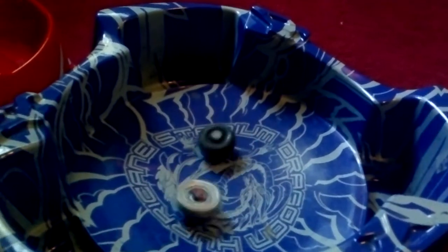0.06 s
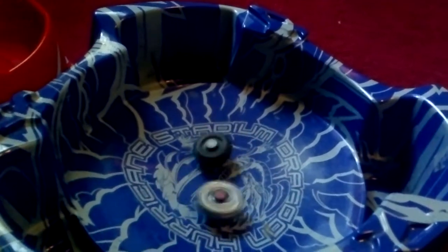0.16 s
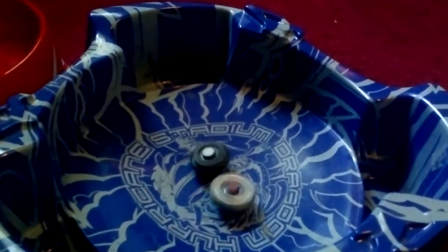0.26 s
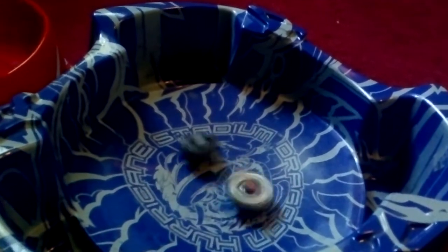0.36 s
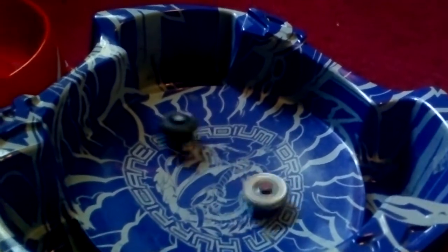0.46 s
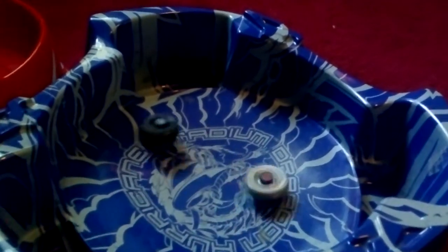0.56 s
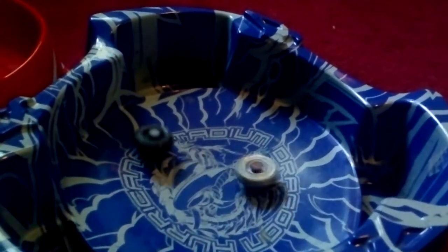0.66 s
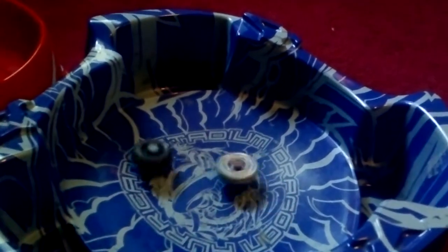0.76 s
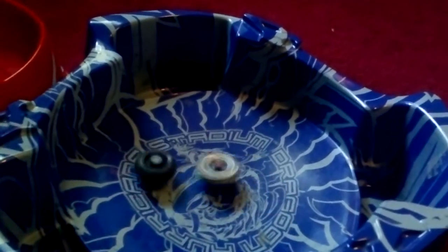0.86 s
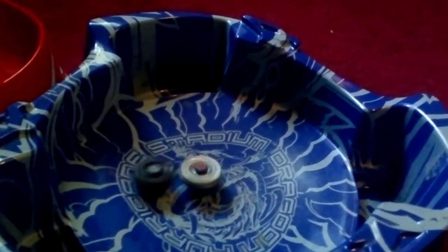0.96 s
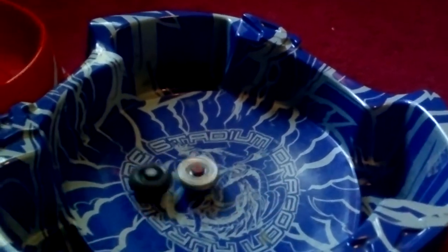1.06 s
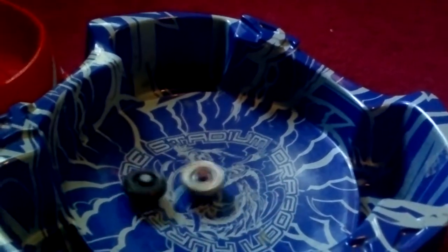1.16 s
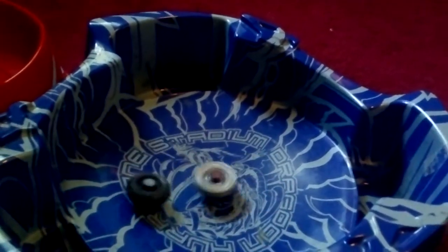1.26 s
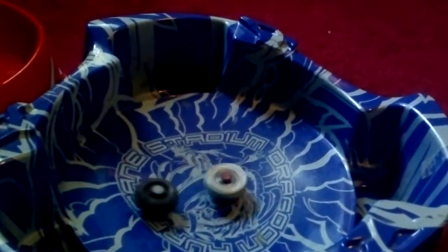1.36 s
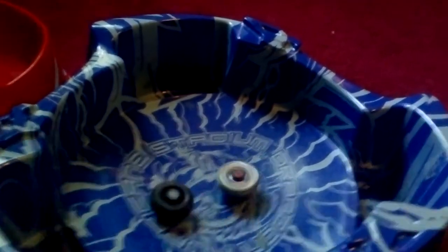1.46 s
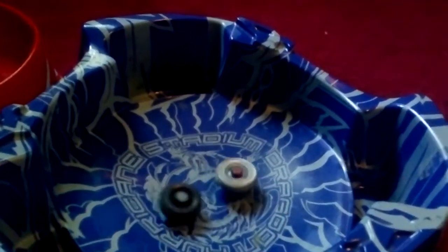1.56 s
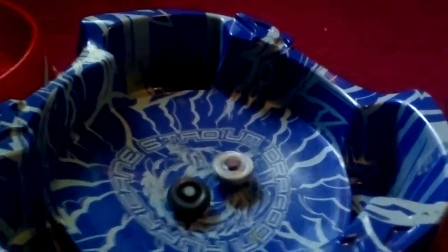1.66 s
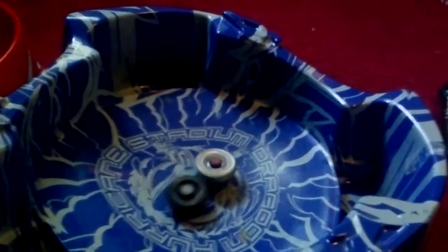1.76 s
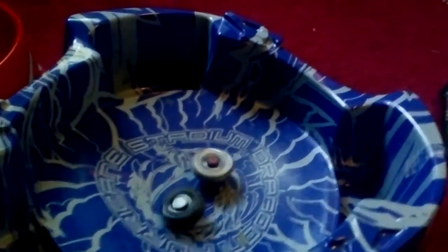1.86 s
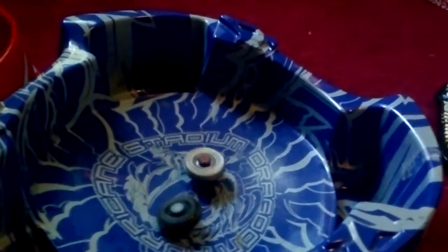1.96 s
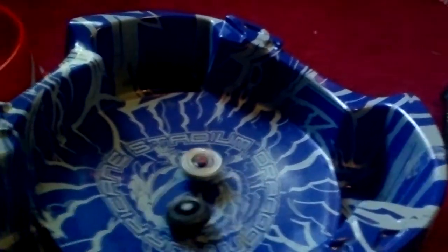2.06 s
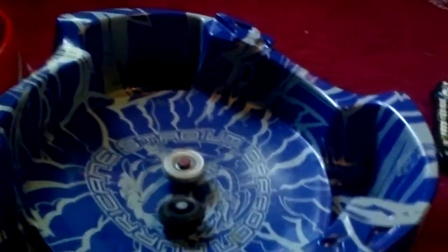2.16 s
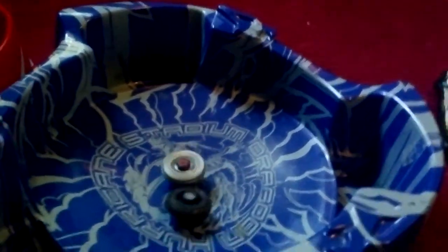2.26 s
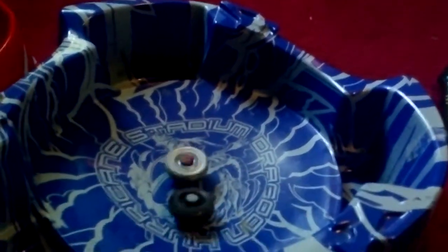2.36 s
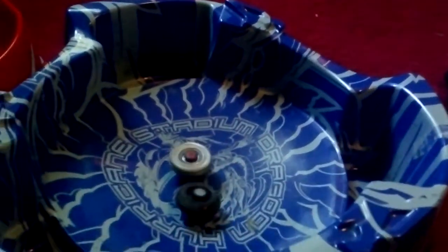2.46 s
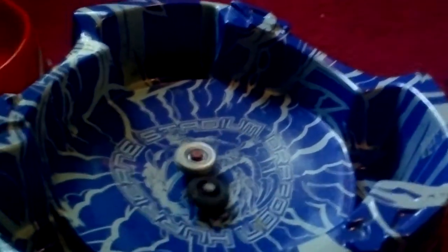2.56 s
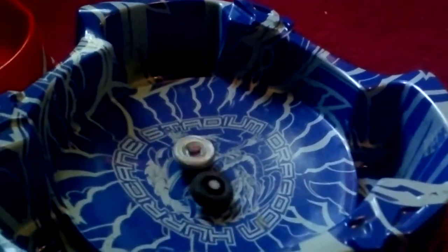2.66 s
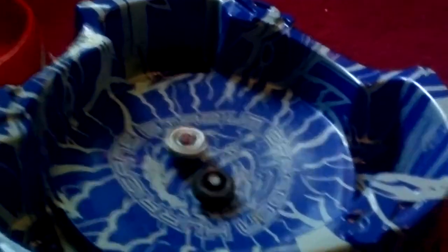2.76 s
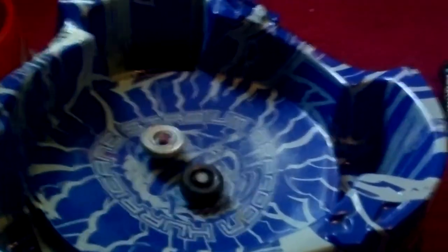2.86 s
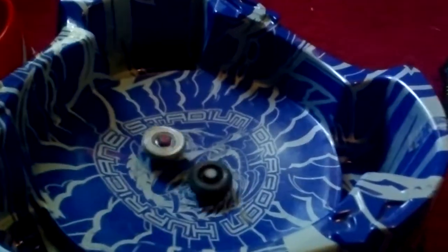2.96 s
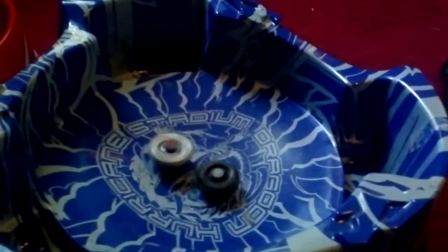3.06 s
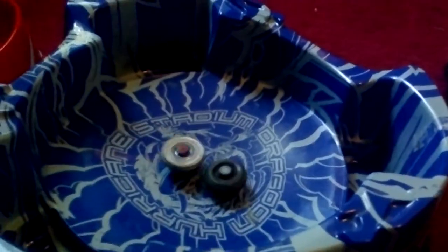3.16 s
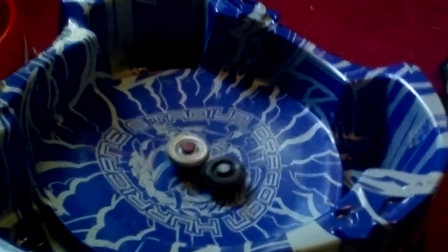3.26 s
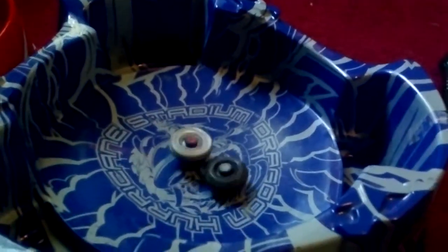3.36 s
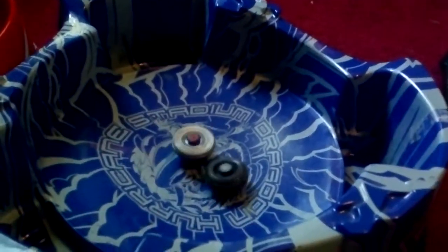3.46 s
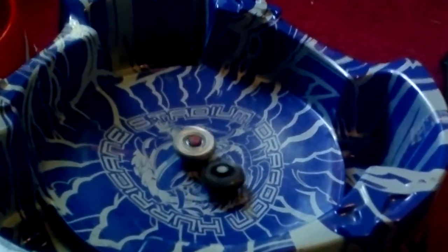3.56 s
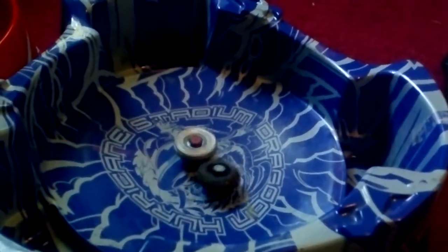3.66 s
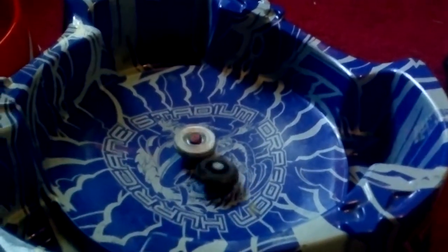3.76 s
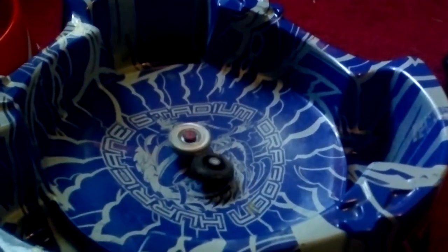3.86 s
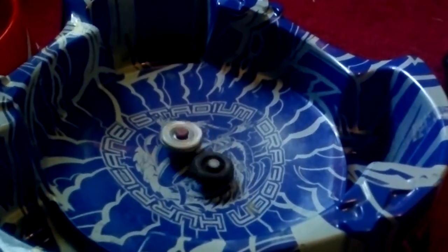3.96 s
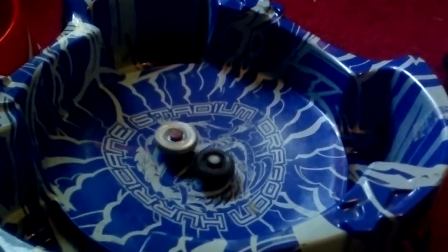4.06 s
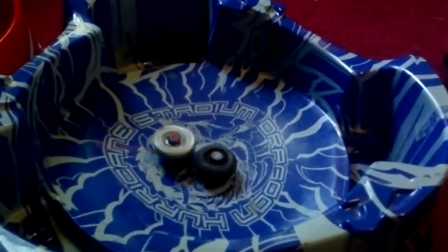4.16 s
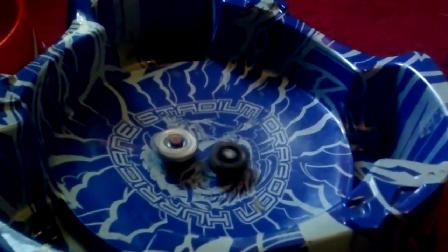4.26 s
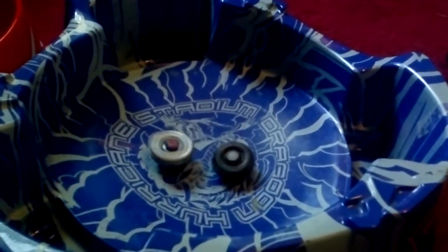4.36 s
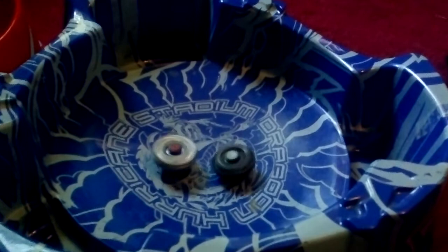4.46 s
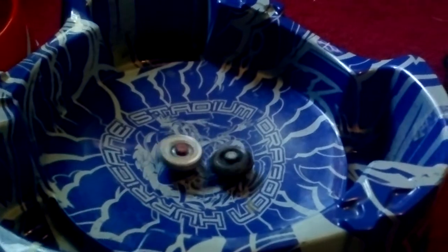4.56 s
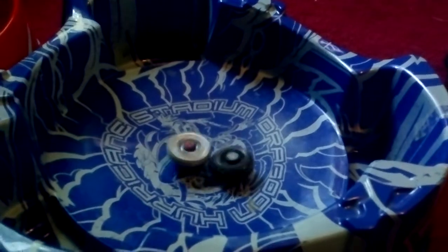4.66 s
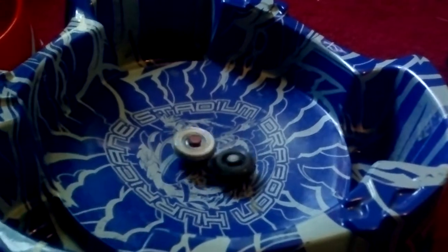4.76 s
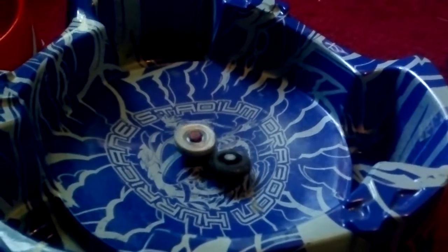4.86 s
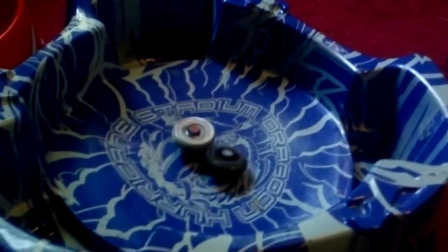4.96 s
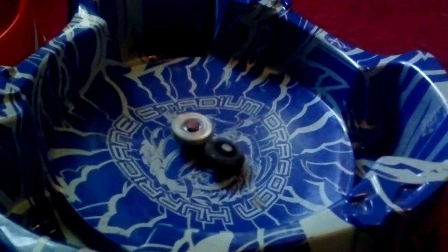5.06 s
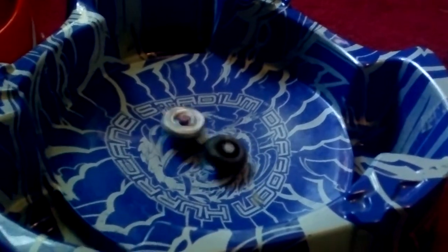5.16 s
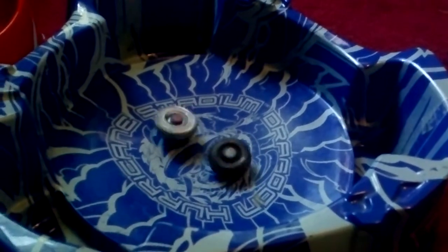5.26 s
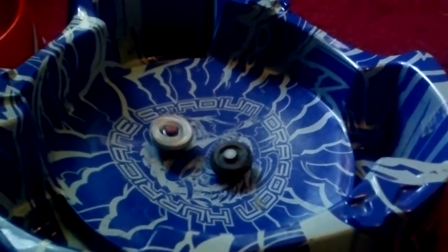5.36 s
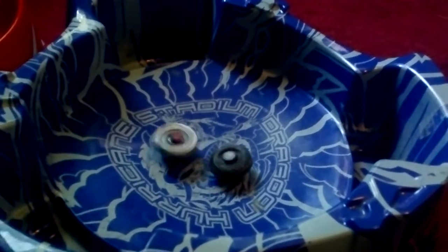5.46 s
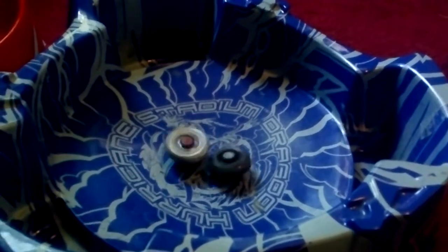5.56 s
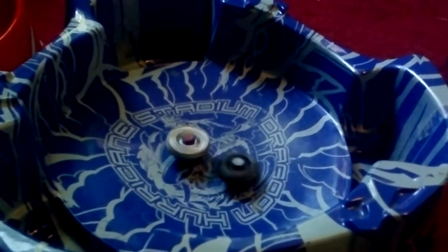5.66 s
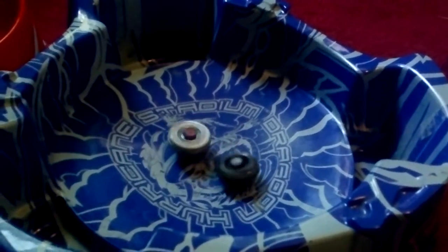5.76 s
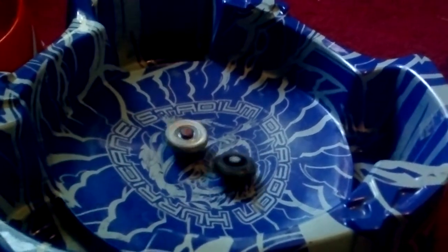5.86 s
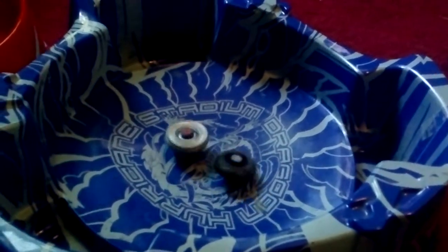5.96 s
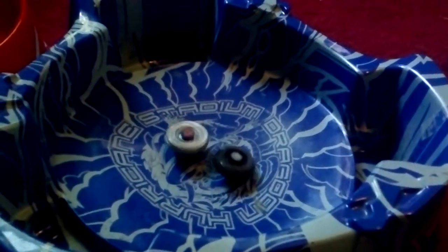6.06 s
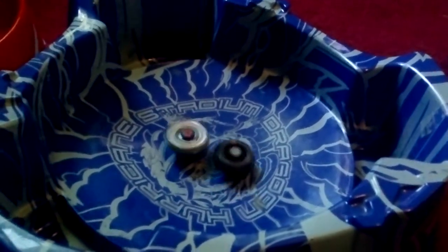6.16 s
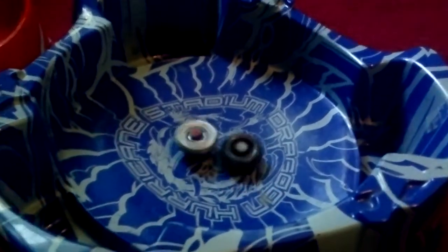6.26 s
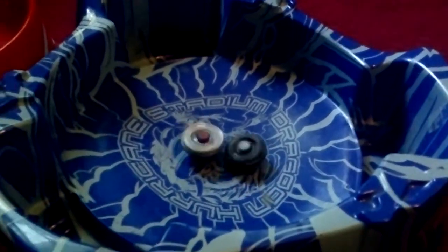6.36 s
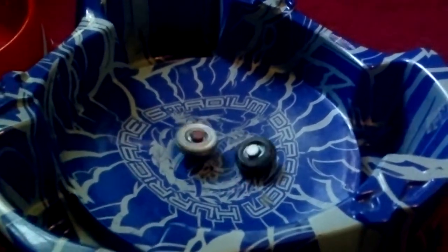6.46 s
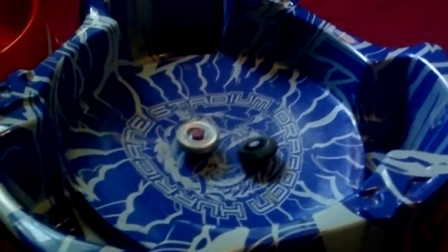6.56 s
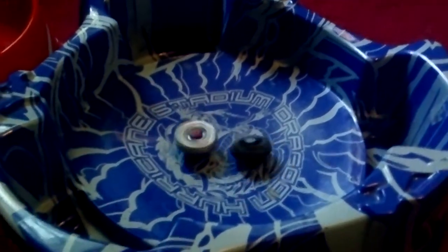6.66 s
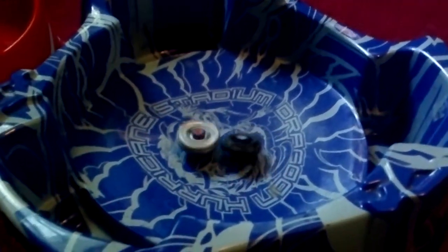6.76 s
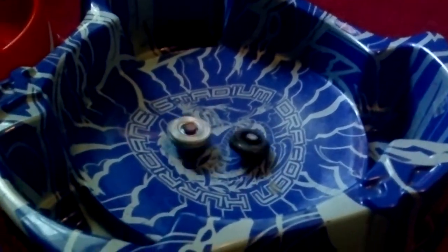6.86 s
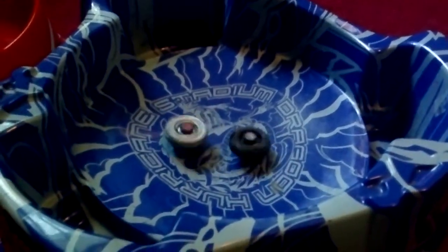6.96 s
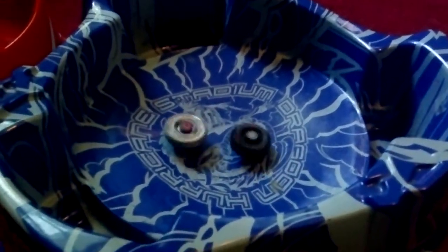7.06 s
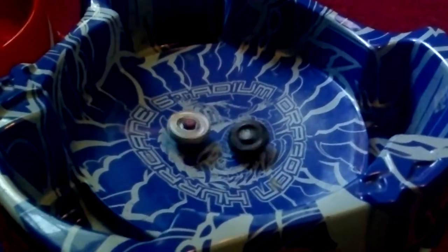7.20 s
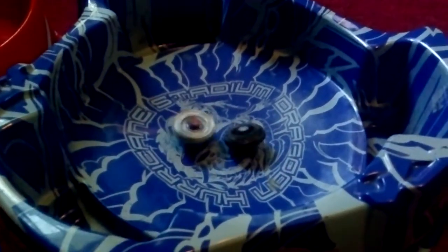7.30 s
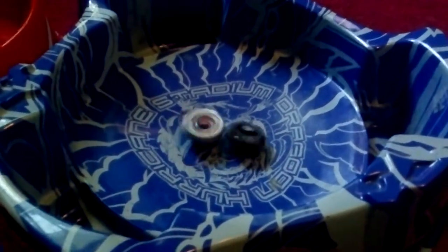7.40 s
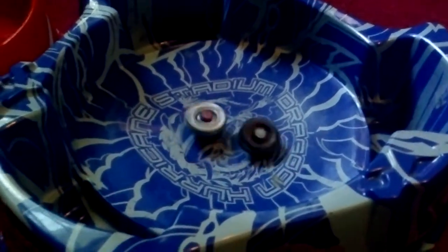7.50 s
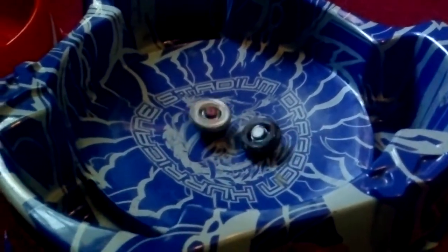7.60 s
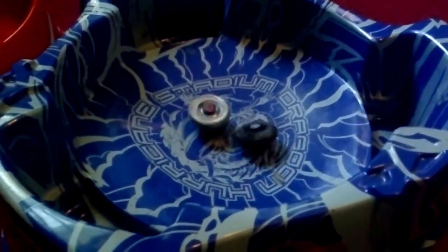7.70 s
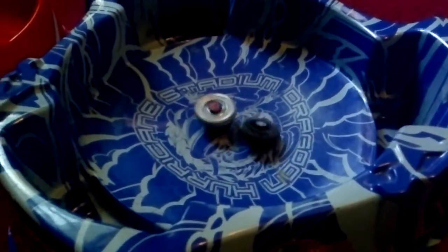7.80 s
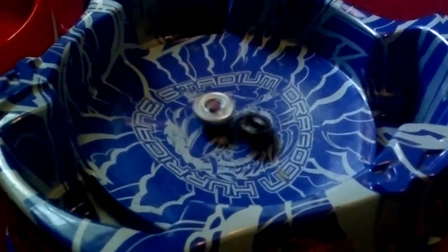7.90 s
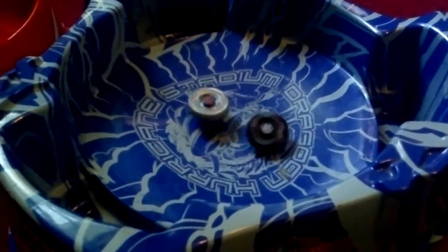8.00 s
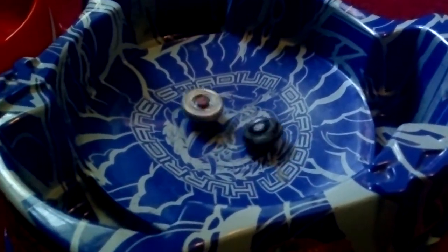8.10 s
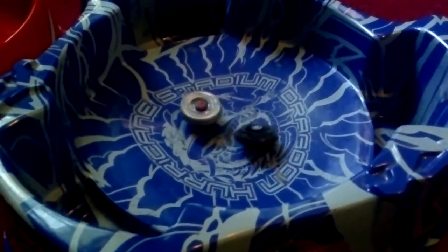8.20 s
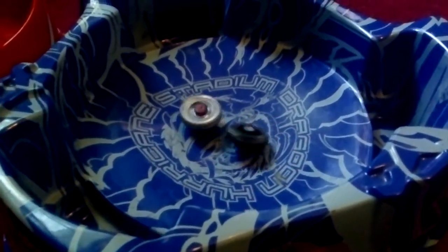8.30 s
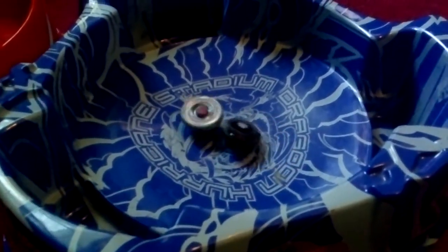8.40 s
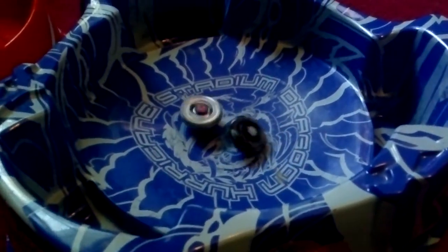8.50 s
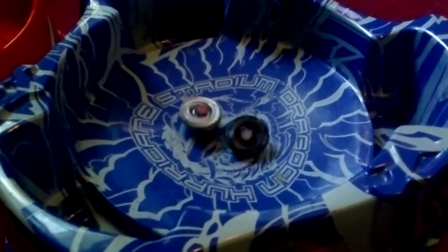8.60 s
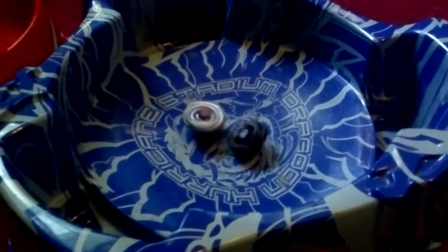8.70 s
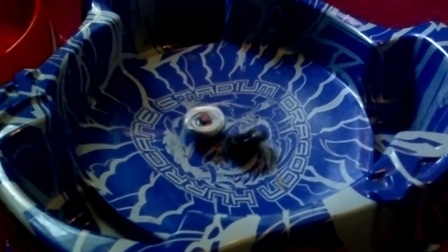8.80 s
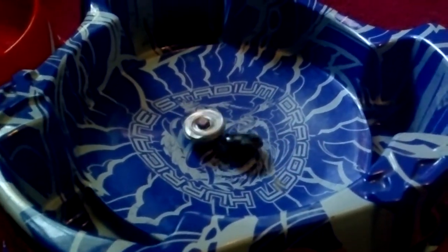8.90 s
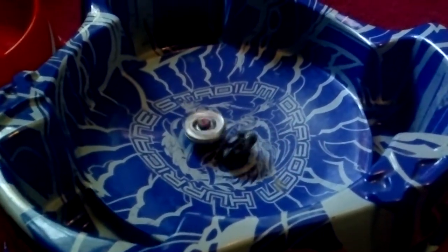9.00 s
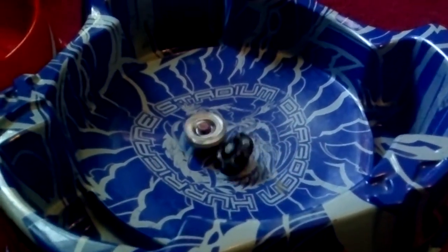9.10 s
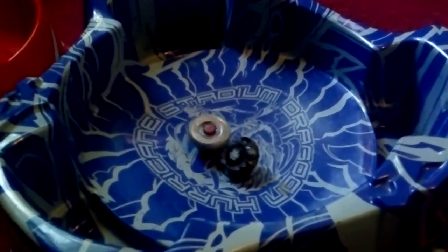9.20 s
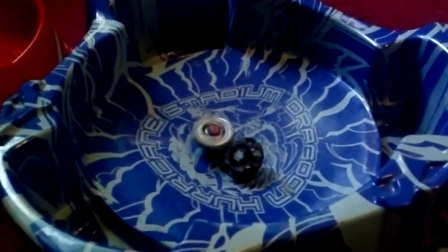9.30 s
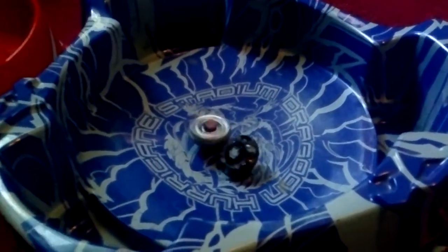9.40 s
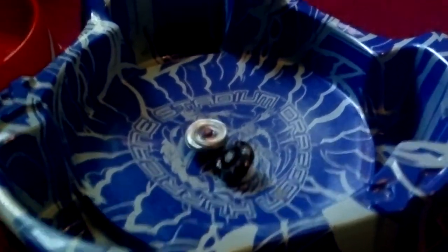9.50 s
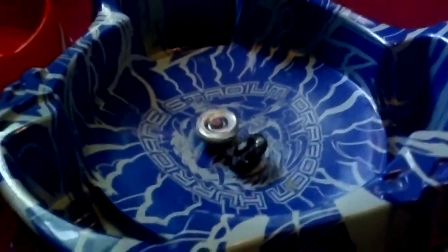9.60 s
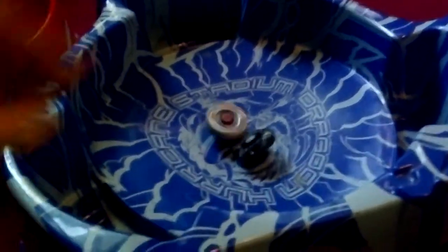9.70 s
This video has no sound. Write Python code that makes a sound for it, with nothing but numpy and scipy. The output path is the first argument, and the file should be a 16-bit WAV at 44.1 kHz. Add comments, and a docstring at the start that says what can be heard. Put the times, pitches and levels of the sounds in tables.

```python
"""Two metal-rimmed toy tops clack together as they spin in a thin plastic bowl on a carpet, near a microphone.
Each impact excites damped modes of the rims and the bowl, and a small room adds a decaying tail.
The tips whir, skip and skid as random grains of friction exciting the same bodies; faint squeaks are
narrow-band noise. Steady noise of room and recorder lies beneath, and the loudest clacks overload the recorder."""
import sys
import numpy as np
from scipy import signal
from scipy.fft import rfft, irfft
from scipy.io import wavfile

SR = 44100
rng = np.random.default_rng(int(sys.argv[2]) if len(sys.argv) > 2 else 0)


def unload_audio(sound):
    """Save the sound as a 16-bit wav file, at the path given as the first command line argument."""
    columns = np.transpose(np.atleast_2d(sound))
    # keep every value between -1 and 1, then stretch to whole-number steps
    steps = np.round(np.clip(columns, -1, 1) * 32767)
    wavfile.write(sys.argv[1], SR, steps.astype(np.int16))


N = 429534   # samples in the scene
SPAN = 18000   # samples given to each blow with its tail

# collisions of rim on rim: (time [s], crack level [dB], bright edge level [dB], bowl knock level [dB],
# then the level of each of the four rim rings [dB])
CLACK_EVENTS = [(0.421, 1, 4.5, -18.5, -44, -48, -0.5, -7), (1.0458, 0.5, 8, -22, -23.5, -10, -5.5, 2),
                (1.203, 0, 5.5, -24, -31, -27, 6.5, -11.5), (1.9012, -3, -3, -30.5, -30.5, -32, -10.5, -9),
                (2.3874, 4, 7, -23, -29, -15.5, 1.5, -4.5), (2.7328, -4, -4.5, -28.5, -38, -19, -4, -18),
                (3.341, -6, -7.5, -37.5, -42, -27, -21.5, -22),
                (3.7911, -7, -8, -32.5, -49.5, -24, -2.5, -3),
                (3.9745, -12, -5, -35, -40, -35, -7.5, -14.5),
                (4.3206, -2.5, -1, -24.5, -27.5, -31, -16, -14.5),
                (4.7338, -14, 2.5, -37, -53, -23, -41, -10), (5.217, -13, -4.5, -29.5, -43, -25, -16, -21),
                (5.692, -0.5, 4, -24.5, -24, -6.5, -9.5, -1.5),
                (6.4648, -3.5, -3.5, -33.5, -27, -17, -35, -14),
                (6.8672, -3.5, -1.5, -29, -34, -17.5, -11.5, -14),
                (7.4878, -5, -6, -29.5, -32.5, -26, -34, -14),
                (7.9771, -1, 1.5, -31.5, -31.5, -13.5, -11.5, -16),
                (8.4864, -4, -6.5, -32, -41.5, -30, -55, -7),
                (8.9987, -3.5, -1, -23.5, -24.5, -23, -14, -9),
                (9.4142, -13, -15.5, -39, -59, -35, -18, -19.5),
                (9.523, -19.5, -19, -39.5, -70, -60, -28.5, -23.5),
                (9.6515, -7.5, -14, -28, -58, -39, -15.5, -11)]
# rim modes whose strength depends on the spot struck: (frequency [Hz], T60 [s])
RIM_RINGS = [(2947, 0.16), (5615, 0.078), (5800, 0.046), (6235, 0.027)]
# weaker rim modes: (frequency [Hz], mean level re the crack, or re the edge above 6500 Hz [dB], T60 [s])
RIM_OVERTONES = [(3560, -20, .012), (4780, -18, .01), (6900, -15, .012), (8740, -23, .02),
                 (9600, -22, .018), (10050, -19, .008)]
THUMP_DB, THUMP_PER_EDGE = -11.5, .7   # bowl thump re the knock [dB], extra [dB per dB of bright edge]


def clacks():
    """Modal excitation by impact: each collision sets the rims and the bowl ringing in their damped modes."""
    s, crack_db, edge_db, knock_db, *ring_dbs = np.array(CLACK_EVENTS).T[:, :, None]
    blow = contact(count=len(s), chatter_s=0.0043)
    click = np.arange(SPAN) == 0

    crack = amp(crack_db) * band(blow, 2600, 5600)
    edge = amp(edge_db) * band(blow, 6300, 11280)
    rims = crack + edge
    to_mic_and_room = np.array([[[1]], [[.38]]])   # the rings reach the room more weakly than the crack
    for (hz, t60), db in zip(RIM_RINGS, ring_dbs):
        rims += amp(db) * ring(click, hz, t60) * to_mic_and_room
    for hz, db, t60 in RIM_OVERTONES:
        parent_db = edge_db if hz > 6500 else crack_db
        strength_db = parent_db + db + rng.normal(0, 4, s.shape)
        rims += amp(strength_db) * ring(click, hz, t60)

    knock = above(bowl(blow, above_hz=900) + 4.3 * band(blow, 1000, 3000), 1100)
    knock[1] += 2.9 * band(blow[1], 400, 1500)   # the bowl sends its lower tones sideways, into the room
    thump = bowl(blow, below_hz=1200) + 6.7 * above(band(blow, 100, 1500), 90)
    thump_gain = amp(THUMP_DB + THUMP_PER_EDGE * edge_db)

    direct, radiated = above(rims, 1700) + amp(knock_db) * (knock + thump_gain * thump)
    return in_room(direct, radiated, s[:, 0], wet_db=19, first_s=0.005)


def contact(count, chatter_s):
    """Impulsive contact: a click and a short chatter; averaged over directions, one click of equal energy."""
    t = np.arange(SPAN) / SR
    blow = .5 * rng.standard_normal((count, SPAN)) * np.exp(-t / chatter_s)
    blow[:, 0] = 1
    averaged = (t == 0) * np.linalg.norm(blow, axis=1, keepdims=True)
    return np.stack([blow, averaged])   # toward the microphone, into the room


# bowl modes: (frequency [Hz], level [dB], T60 [s])
BOWL_MODES = [(167.7, -29, 0.047), (300, -19.5, 0.088), (775.5, -16, 0.035), (1110, -23, 0.0052),
              (1638, -2.5, 0.006), (2004, -7, .01), (2540, -40, 0.013)]


def bowl(force, above_hz=0, below_hz=9999):
    """Modal superposition: the plastic bowl responds as a sum of briefly ringing modes."""
    modes = [mode for mode in BOWL_MODES if above_hz < mode[0] < below_hz]
    return sum(amp(db) * ring(force, hz, t60) for hz, db, t60 in modes)


# reverberation of the small room: (frequency [Hz], T60 [s])
ROOM_DECAY = [(200, 0.35), (600, 0.34), (1500, 0.3), (3700, 0.24), (9700, 0.23)]


def in_room(direct, radiated, times, wet_db, first_s):
    """Diffuse reverberation: octave bands of noise swell over first_s and die at the room's decay rates."""
    t = np.arange(SPAN) / SR
    white = rng.standard_normal(direct.shape)   # each sound gets its own tail, as the tops have moved
    tails = 0
    for low in 80 * 2. ** np.arange(8):
        t60 = at_hz(ROOM_DECAY, np.sqrt(2) * low)
        tails = tails + band(white, low, 2 * low) * amp(-60 * t / t60)
    tails = tails * np.clip(t / first_s, 0, 1) ** 2 / np.sqrt(SR)

    reverberant = signal.fftconvolve(radiated, tails, axes=1)[:, :SPAN]
    heard = direct + amp(wet_db) * reverberant
    out = np.zeros(N + SPAN)
    for s, sound in zip(times, heard):
        first = round(s * SR)
        out[first:first + SPAN] += sound
    return out[:N]


# landings of a tip on the bowl: (time [s], level [dB], treble re that level [dB])
SKIP_EVENTS = [(0.204, -34, -11), (0.255, -34, -2), (0.459, -21.5, 5.5), (0.489, -21, 2), (0.525, -27, 2),
               (0.566, -36, -3), (0.59, -36, 5), (0.642, -31, 8), (0.721, -38, -17), (0.769, -36.5, 2.5),
               (0.794, -34, -7), (1.231, -21.5, -1), (1.255, -33, -2), (4.085, -42.5, 5.5),
               (4.207, -44, 0.5), (4.263, -43, -18.5), (5.445, -39.5, -2), (6.678, -37.5, -1),
               (6.781, -40.5, 0.5), (8.592, -28, -1.5), (8.707, -40, -1), (8.734, -30.5, -2.5),
               (9.053, -23.5, 0), (9.08, -19, -2), (9.104, -23.5, -5), (9.134, -26, -5),
               (9.164, -27.5, 14.5), (9.214, -35.5, 11.5), (9.359, -31, -15), (9.578, -40, -5),
               (9.734, -30, -10)]


def skips():
    """Impact of a tip: the blow excites mostly the bowl, with a tick that wakes the rim."""
    s, db, treble_db = np.array(SKIP_EVENTS).T[:, :, None]
    blow = contact(count=len(s), chatter_s=0.0049)
    tick = band(blow, 3500, 13000) + 0.032 * above(ring(blow, 6000, 0.0087), 3300)
    modes = 0.26 * bowl(blow, above_hz=900) + .1 * bowl(blow, below_hz=900)
    body = modes + 0.5 * band(blow, 560, 3000)
    direct, radiated = amp(db) * (above(body, 200) + amp(treble_db) * tick)
    return in_room(direct, radiated, s[:, 0], wet_db=14.5, first_s=0.0042)


# tips rubbing steadily on the bowl: (time [s], rasp level [dB])
WHIR_LEVEL = [(0.0, -54.5), (1.38, -56.5), (3.33, -59.5), (3.9, -60.5), (4.04, -61), (6.37, -63),
              (6.65, -62), (8.3, -62), (8.52, -63), (8.95, -59.5), (9.52, -64), (9.74, -82)]
# drone and rim hiss re the rasp: level at the start [dB], change as the tops slow [dB per s]
DRONE_DB, DRONE_DB_PER_S = -0.5, -0.473
RIM_DB, RIM_DB_PER_S = -1.5, -.5
TURNS_PER_S, SLOWING_PER_S = 30, 1.7   # mean turns per s at the start, turns per s lost each s


def whir():
    """Modulated friction noise: fine grains throb once a turn and excite the bowl and two rim resonances."""
    t = np.arange(N) / SR
    rasp_db, = in_time(WHIR_LEVEL)
    turns_per_s = (TURNS_PER_S - SLOWING_PER_S * t) * (1 + .08 * drift(2.6))
    turn = np.cumsum(turns_per_s) / SR
    throb = amp(2.0 * np.cos(2 * np.pi * turn) + 1.8 * drift(6) + 2.5 * drift(35))
    drone, rasp, grains = rubbing(per_s=3500, uneven_db=2.5, smooth=0.26, throb=throb)

    rim = rms_one(ring(grains, 6010, .004)) - .45 * rms_one(ring(grains, 4820, .006))
    shuffled = rng.permutation(grains) * throb   # throbs alike, but grain by grain independent
    hiss = amp(3.1 * drift(45)) * rim + .5 * rms_one(band(shuffled, 4300, 13000))
    drone_gain = amp(DRONE_DB + DRONE_DB_PER_S * t)
    rim_gain = amp(RIM_DB + RIM_DB_PER_S * t)
    return amp(rasp_db) * (rasp + drone_gain * drone + rim_gain * above(hiss, 2000))


def rubbing(per_s, uneven_db, smooth, throb):
    """Granular friction: random grains, as heard in the low bowl modes, the upper ones and unfiltered."""
    struck = rng.random(N) < per_s / SR
    size = amp(uneven_db * np.minimum(rng.exponential(1, N), 5))
    grains = struck * size * rng.choice([-1, 1], N)
    grains = throb * (rms_one(grains) + smooth * rng.standard_normal(N))
    drone = rms_one(above(bowl(grains, below_hz=900), 99.5)) + 2.3 * rms_one(band(grains, 117.1, 1100))
    rasp = rms_one(above(bowl(grains, above_hz=900), 600)) + 2.1 * rms_one(band(grains, 590, 2000))
    return rms_one(drone), rms_one(rasp), grains


# a tip skids across the bowl: (start [s], rise [s], end [s], peak rasp level [dB], fade [dB per s],
# low part re the rasp [dB], treble re the rasp [dB])
SKID_EVENTS = [(0.44, 0.033, .6, -39.5, 40.3, 0, -5), (1.219, 0.01, 1.31, -37.5, 250, 4, 2.5),
               (5.225, .012, 5.4, -37, 250, -8.5, -1.5), (6.636, 0.0086, 6.715, -48.5, 40, -0.5, -7.5),
               (6.75, 0.021, 6.82, -56.5, 30, -7, -3.5), (8.73, 0.052, 8.99, -41, 65.5, -15.5, -2.5),
               (9.01, 0.0089, 9.13, -34.5, 70, -11, -4.5)]
SKID_RISE_DB, SKID_STOP_DB_PER_S = 15, 600   # a skid starts this far under its peak; extra fade after its end


def skids():
    """Coarse granular friction: grains in clumps with a grinding treble; each swells quickly, fades and stops."""
    clumps = amp(3.0 * drift(45) + 1.0 * drift(14))
    drone, rasp, grains = rubbing(per_s=1200, uneven_db=3.3, smooth=.45, throb=clumps)
    # partly out of step with the bowl
    grind = rms_one(band(0.67 * grains + rng.permutation(grains), 2970, 9000))
    grind += .6 * amp(3.5 * drift(40)) * rms_one(ring(grains, 6010, .008))   # the rim chirps along

    t, out = np.arange(N) / SR, np.zeros(N)
    for start, rise, end, db, fade_db, low_db, treble_db in SKID_EVENTS:
        past_peak = t - start - rise
        swell_and_fade_db = np.minimum(SKID_RISE_DB * past_peak / rise, -fade_db * past_peak)
        stop_db = SKID_STOP_DB_PER_S * np.maximum(t - end, 0)
        gain = amp(db + swell_and_fade_db - stop_db)
        out += gain * (rasp + amp(low_db) * drone + amp(treble_db) * grind)
    return out


# faint squeaks: (start [s], end [s], centre frequency [Hz], level [dB])
SQUEAK_EVENTS = [(7.054, 7.152, 2420, -63), (7.272, 7.35, 2540, -64.5)]


def squeaks():
    """Narrow-band noise: a band 80 Hz wide is heard as a thin, unsteady whistle that comes and goes."""
    t, white = np.arange(N) / SR, rng.standard_normal(N)
    out = np.zeros(N)
    for start, end, hz, db in SQUEAK_EVENTS:
        whistle = rms_one(band(white, hz - 40, hz + 40))
        corners = [start - .01, start + .01, end - .02, end + 0.021]
        out += amp(db) * whistle * np.interp(t, corners, [0, 1, 1, 0])
    return out


# spectral shape of room and recorder noise: (frequency [Hz], relative density [dB])
NOISE_SHAPE = [(15, -42.5), (25, 1.5), (44, -1), (132, -2), (504, -4), (735, -3.5), (855, -4.5),
               (1970, -6.5), (4090, -11), (9640, -12), (10400, -5.5), (13500, -44), (22000, -120)]


def background():
    """Stationary noise: a random spectrum weighted by the shape of room and recorder noise."""
    shape = amp(at_hz(NOISE_SHAPE, np.fft.rfftfreq(N, 1 / SR)))
    noise = irfft(rfft(rng.standard_normal(N)) * shape, N)
    return amp(-61) * rms_one(noise)


def ring(x, hz, t60):
    """Damped resonator: a unit click sets a decaying sine of initial height 1 ringing."""
    r, w = amp(-60 / (t60 * SR)), 2 * np.pi * hz / SR
    return signal.lfilter([0, np.sin(w)], [1, -2 * r * np.cos(w), r * r], x + 1e-18)


def band(x, low_hz, high_hz):
    """Band limitation: a Butterworth band-pass."""
    return signal.sosfilt(signal.butter(2, [low_hz, high_hz], "band", fs=SR, output="sos"), x + 1e-18)


def above(x, hz):
    """Radiation limit: small parts radiate no bass, so a steep high-pass removes it."""
    return signal.sosfilt(signal.butter(4, hz, "high", fs=SR, output="sos"), x + 1e-18)


def drift(rate):
    """Slow random modulation: straight lines between normal values of spread 1, 2 * rate of them per s."""
    knots = np.arange(0, N / SR + 1, .5 / rate)
    return np.interp(np.arange(N) / SR, knots, rng.standard_normal(len(knots)))


def amp(db):
    """Logarithmic level: the amplitude gain of a dB value."""
    return 10 ** (np.asarray(db, float) / 20)


def rms_one(x):
    """Normalisation: scales x to rms 1 along time."""
    return x / np.sqrt(np.mean(x ** 2, axis=-1, keepdims=True) + 1e-20)


def in_time(rows):
    """Linear interpolation: the columns of a time table at every sample."""
    s, *columns = np.transpose(rows)
    return [np.interp(np.arange(N) / SR, s, c) for c in columns]


def at_hz(points, hz):
    """Interpolation in pitch: a spectrum table read on a log-frequency axis."""
    table_hz, values = np.array(points).T
    return np.interp(np.log(hz + 1), np.log(table_hz), values)


def scene():
    """Linear superposition: all sources add at the microphone."""
    return (clacks() + skips() + whir() + skids() + squeaks() + background())[None]


MIC_EDGE_HZ, CUTOFF_HZ = 10970, 16700   # stop-band edges of the main treble and of the final cut
AIR_HZ, AIR_DB = 11850, -21   # centre and gain of the weak band above the main treble
TOP = .7   # amplitude at which overload levels off


def record(dry):
    """Band limiting and saturation: treble ends abruptly but for a weak band; loud clacks are squared off."""
    body = signal.sosfilt(signal.cheby2(18, 68, MIC_EDGE_HZ, fs=SR, output="sos"), dry)
    air = dry
    for _ in range(2):   # two passes for steeper sides
        air = band(air, AIR_HZ - 400, AIR_HZ + 400)
    loud = (body + amp(AIR_DB) * air) / TOP
    squared = TOP * loud / (1 + loud ** 8) ** .125
    return signal.sosfilt(signal.cheby2(12, 70, CUTOFF_HZ, fs=SR, output="sos"), squared)


dry = scene()
out = record(dry)
unload_audio(out)
```